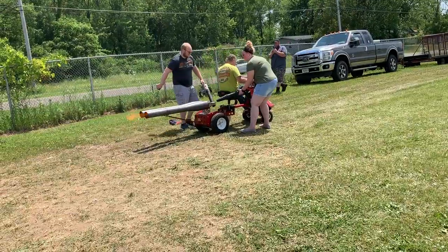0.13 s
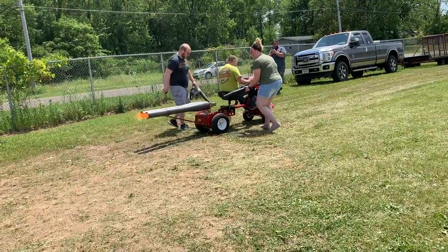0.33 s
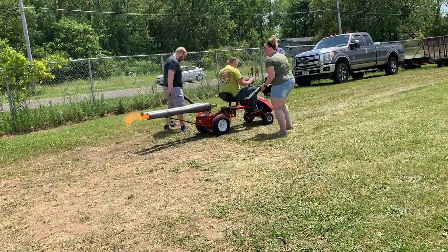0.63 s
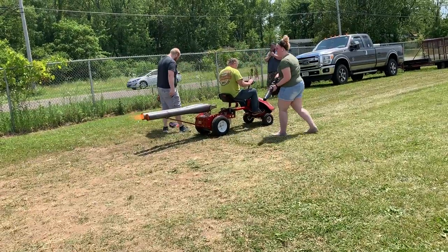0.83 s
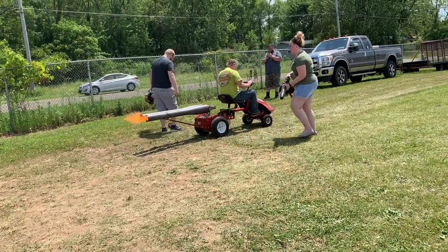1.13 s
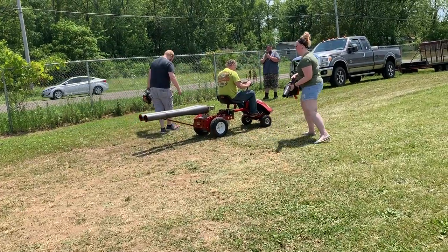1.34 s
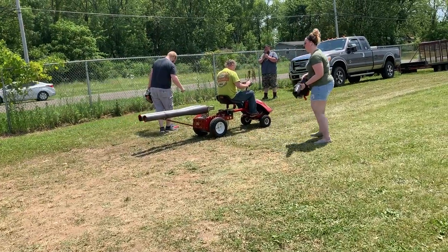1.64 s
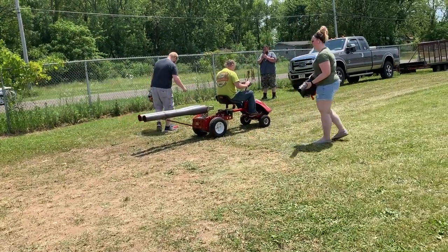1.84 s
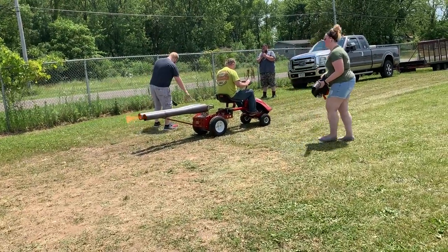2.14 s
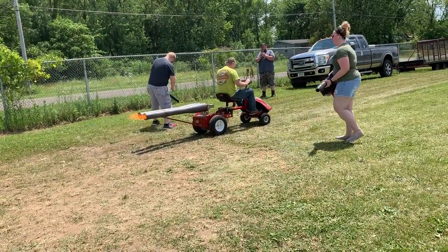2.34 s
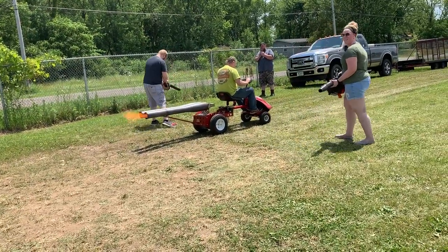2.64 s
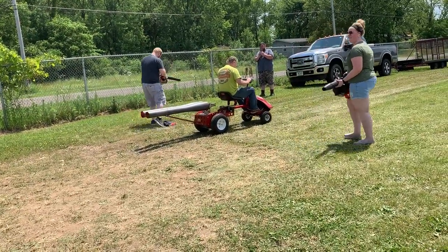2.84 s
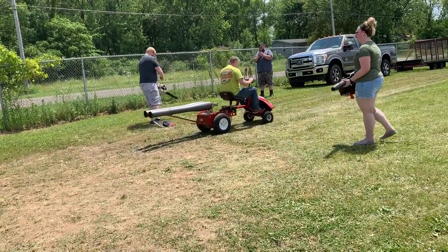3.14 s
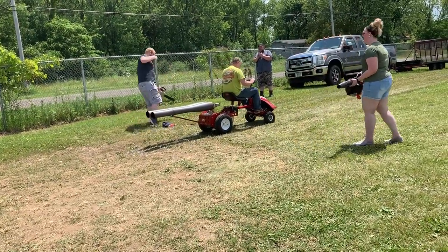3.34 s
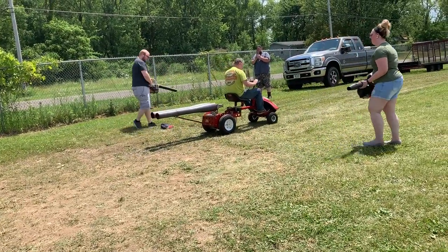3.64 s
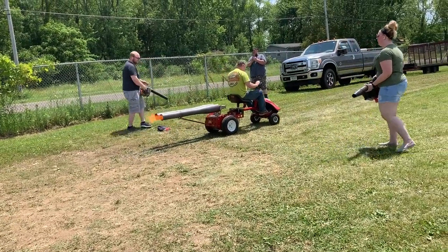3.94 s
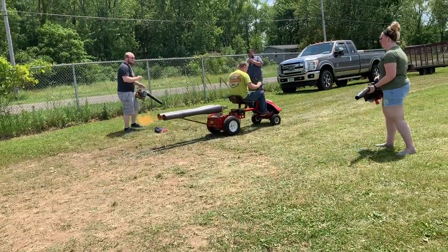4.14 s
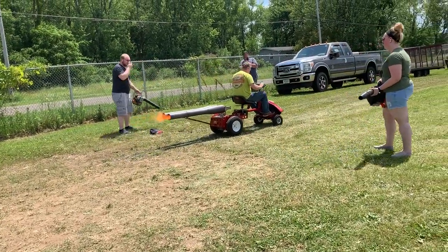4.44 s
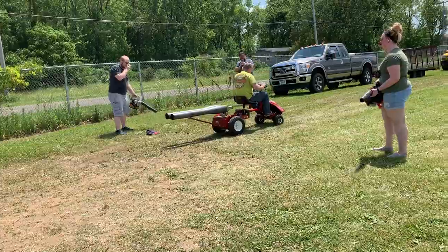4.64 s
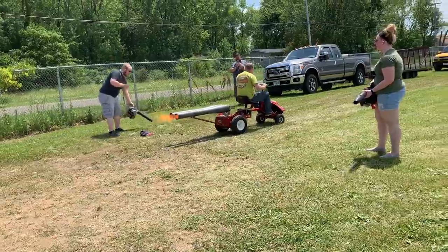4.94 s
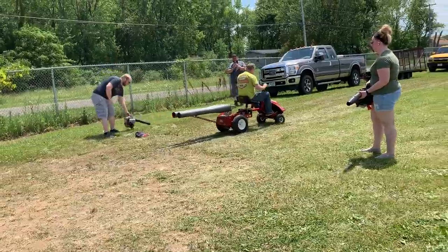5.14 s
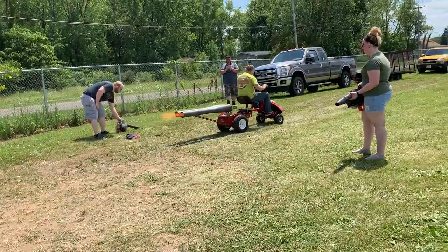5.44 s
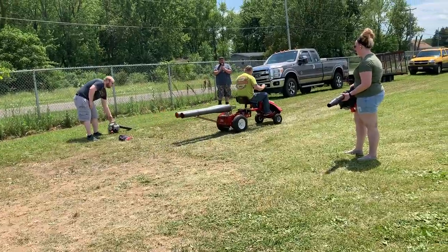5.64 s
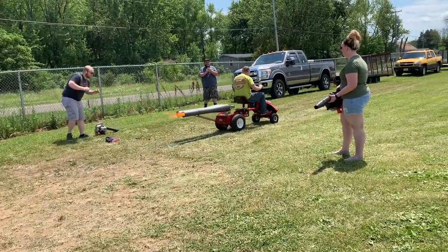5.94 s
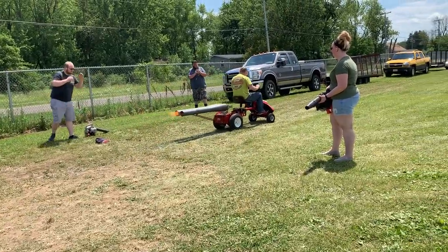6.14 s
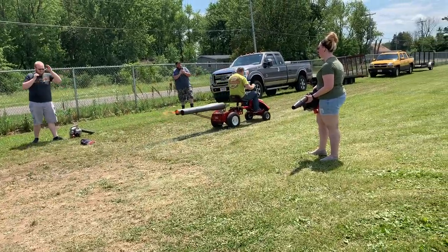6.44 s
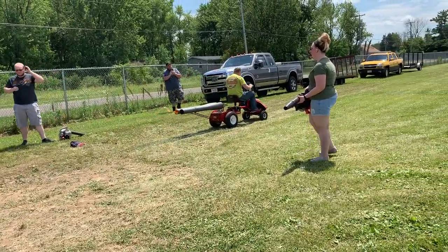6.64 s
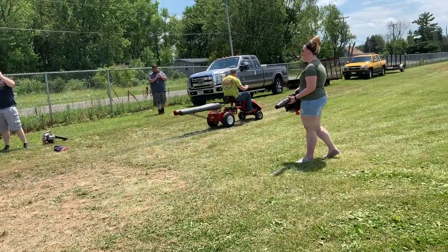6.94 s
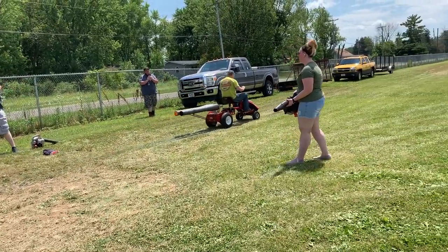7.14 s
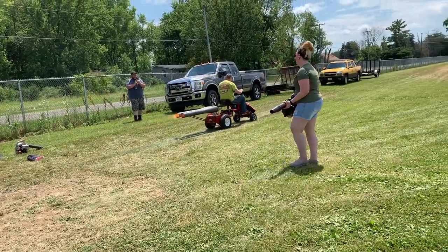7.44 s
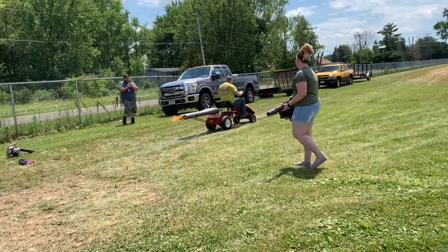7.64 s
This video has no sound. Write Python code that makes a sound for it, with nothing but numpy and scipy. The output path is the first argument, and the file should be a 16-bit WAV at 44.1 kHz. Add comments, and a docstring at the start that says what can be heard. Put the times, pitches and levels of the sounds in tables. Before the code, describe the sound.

From 0 seconds two pulse jets on a small tractor are already running at full, locked together in a loud low drone around 114 hertz, mostly smooth fundamental with soft overtones and a muffled roar beneath. Within the first second and a half the burn sags and rebounds several times, and ragged gas cracks, one per cycle, grow out of the hum. From about 1.5 to 6.5 seconds the buzz is harsh and raspy, with sizzling treble and sporadic harder pops, notably near 2.8, 3.4 to 3.6, 5.1 and 5.75. Pitch wavers and drifts down slightly to about 110. After 6.5 the crackle softens as the pipes swing away, while overtones keep the drone full and buzzing. It is still running when it stops at 7.8. Open lawn, very short dull ground reflection, phone stereo with treble differing between sides.

```python
"""Two pulse jets drone in step on a small tractor over a lawn: a steady pipe tone with overtones.
Each mouth also throws a ragged crack of gas once a cycle, in three bands of gated noise, over filtered roar.
Short dips and rebounds make the burn surge and sag; a dulled, delayed copy of the gas noise is the lawn's echo.
The echo shortens and fades as the pipes swing away. A phone's two microphone ports hear the treble apart."""
import sys
import numpy as np
from scipy import signal
from scipy.fft import rfft, irfft
from scipy.io import wavfile
from scipy.ndimage import uniform_filter1d, map_coordinates

SR = 44100
rng = np.random.default_rng(int(sys.argv[2]) if len(sys.argv) > 2 else 0)


def store_pcm(level_fs):
    """Save levels as 16-bit WAV."""
    pcm = np.round(np.clip(level_fs, -1, 1) * 32767).astype(np.int16)
    wavfile.write(sys.argv[1], SR, np.atleast_2d(pcm).T)


N = 343098  # samples, about 7.78 s


def undb(db):
    """Turn dB into a linear gain."""
    return 10 ** (np.asarray(db) / 20)


def unit(x):
    """Scale to rms 1."""
    return x / np.sqrt(np.mean(x ** 2))


def over_time(column_s, column):
    """Draw a table column as a straight-line envelope over the scene."""
    return np.interp(np.arange(N) / SR, column_s, column)


def over_hz(table):
    """Spread table values over every FFT bin, straight on a log-frequency axis."""
    hz, value = np.transpose(table)
    bins_hz = np.fft.rfftfreq(N, 1 / SR)
    return np.interp(np.log(bins_hz + 1), np.log(hz), value)


def colour(x, table):
    """Filter by a spectrum table in Hz and dB, then scale to rms 1."""
    return unit(irfft(rfft(x) * undb(over_hz(table)), N))


def walk(rate):
    """Smooth random drift: levels held for 1 / rate s, slewed twice, rms 1."""
    hold = int(SR / rate)
    steps = np.repeat(rng.standard_normal(N // hold + 1), hold)
    return unit(uniform_filter1d(uniform_filter1d(steps, hold), hold)[:N])


# The burn starves, then flares back; depth is before the tone and crack scalings
# columns: dip_s [s], depth_db [dB], wait_s [s from dip to flare]
STUMBLES = [(0.327,3,0.055),(0.535,4.5,0.065),(0.67,2,0.068),(0.798,1.0,0.12),(1.074,4.5,0.045),(1.177,2.5,0.062),(1.375,1.9,0.038),(1.455,1,0.04),(1.846,1.5,0.045),(1.959,2.3,0.035),(2.05,1.5,0.027),(2.137,1.5,0.039),(2.241,2,0.055),(2.325,1.7,0.034),(2.74,1.6,0.038),(2.832,3,0.042),(2.943,4,0.04),(3.277,2.5,0.043),(3.76,2.5,0.03),(3.847,1,0.035),(3.937,1.5,0.046),(4.02,1.4,0.035),(4.112,1,0.042),(4.226,2,0.037),(4.328,2,0.044),(4.422,1.5,0.035),(4.677,1.5,0.035),(5.01,1,0.032),(5.104,3.5,0.036),(5.315,1.5,0.033),(5.401,1.5,0.08),(5.529,3,0.035),(5.643,1,0.063),(5.931,1.7,0.04),(6.146,0.7,0.049),(6.413,2,0.06),(6.537,1.8,0.031),(6.667,1.2,0.07),(7.128,3,0.07),(7.29,2,0.093),(7.603,2,0.032)]
REBOUND, STUMBLE_WIDTH = 0.83, 0.37  # flare height over dip depth; bell width over wait
TONE_PER_DEPTH, CRACK_PER_DEPTH = 0.92, 2.34  # dB per dB of burn
FLUTTER_DB, FLUTTER_PER_S = 0.59, 22  # burn flutter, before those scalings
CRACK_FLUTTER_DB, FLARE_TOP_DB = 1.01, 5.5  # the crack's own flutter; its swell is capped here


def burn_surges():
    """Tone and crack swell in dB: starved dips and rebounds over a constant random flutter of the flame."""
    dip_s, depth_db, wait_s = np.transpose(STUMBLES)
    coarse_s = np.arange(0, N / SR, .002)[:, None]

    def bell(centre_s):
        return np.exp(-.5 * ((coarse_s - centre_s) / (STUMBLE_WIDTH * wait_s)) ** 2)

    stumble_db = (REBOUND * bell(dip_s + wait_s) - bell(dip_s)) @ depth_db
    burn_db = over_time(coarse_s[:, 0], stumble_db) + FLUTTER_DB * walk(FLUTTER_PER_S)
    crack_surge_db = CRACK_PER_DEPTH * burn_db + CRACK_FLUTTER_DB * walk(FLUTTER_PER_S)
    return TONE_PER_DEPTH * burn_db, np.minimum(crack_surge_db, FLARE_TOP_DB)


# Slow course of the firing rate, before the random wander
# columns: time_s [s], rate_hz [Hz]
FIRING_RATE = [(0, 114.3), (.5, 113.6), (.9, 114), (1.2, 112.8), (1.7, 113.7), (2.05, 112.6), (2.6, 113.5),
               (3.4, 111.6), (3.6, 112.6), (4.1, 111.2), (4.5, 112.2), (5.3, 112.2), (5.75, 110.3),
               (6, 111.2), (6.4, 109.8), (7, 110.1), (7.3, 112), (7.78, 110.2)]
WANDER_HZ, WANDER_PER_S = 0.6027, 9


def firing_turns(tone_surge_db):
    """Firing cycles elapsed: the pipes run a little faster while the burn is growing."""
    hz = over_time(*np.transpose(FIRING_RATE)) + WANDER_HZ * walk(WANDER_PER_S)
    burn_growth = np.gradient(tone_surge_db) * SR  # dB per s
    hz = hz + 0.017 * burn_growth + 0.811 * walk(45)
    return 1 + np.cumsum(hz) / SR


# Pipe fundamental and overtones, one row each, before surge and flicker
# columns: level_db [dB], follow [dB per dB of crack], growth_db [dB gained as the pipes swing away],
#          growth_power [exponent of scene time, 0 to 1]
PARTIALS = [(-12.5, 0.09, 0.2, 1.1), (-23, 0.18, 6.5, 1.45), (-36, 0.36, 10, 1.74), (-28, .5, 2, 1.3),
            (-39.5, 0, 7.5, 3.8)]
LEAD, LAG, WAVER = 2.3, 1.85, .15  # overtone phase, radians: second's lead, lag per further one, waver


def pipe_tone(turns, push_db, surge_db):
    """Resonating pipes as a stack of cosines; higher overtones trail in phase and waver more."""
    progress = np.arange(N) / (N - 1)
    out = 0
    for k, (level_db, follow, growth_db, growth_power) in enumerate(PARTIALS):
        partial_db = level_db + follow * push_db + growth_db * progress ** growth_power
        shift = (LEAD - LAG * (k - 1) + WAVER * np.sqrt(k) * walk(25)) if k else 0
        steepening = 1.3 if k else 1  # overtones surge harder than the fundamental
        flicker_db = (0.067 + 0.1 * k) * walk(30)
        gain = np.sqrt(2) * undb(partial_db + steepening * surge_db + flicker_db)
        out = out + gain * np.cos((k + 1) * 2 * np.pi * turns + shift)
    return out


# Firings of one pipe that crack much louder; each noise band takes its own share of the boost
# columns: bang_s [s], boost_db [dB before that share]
BANGS = [(0.362, 5), (1.992, 7), (2.09, 6), (2.205, 7.5), (2.533, 5.5), (2.761, 12), (3.082, 7.5),
         (3.357, 8), (3.385, 12), (3.477, 10.5), (3.564, 11), (3.599, 10), (3.786, 6.5), (4.29, 5.5),
         (4.325, 8.5), (4.834, 6.5), (4.957, 8.5), (5.049, 11.5), (5.156, 11.5), (5.28, 6.5), (5.746, 10),
         (5.774, 8), (6.178, 5), (6.205, 5), (6.586, 6.5)]


def firings(turns):
    """Per pipe: random lateness and size of each firing (spread 1), and the boost of the loud bangs."""
    late, size = rng.standard_normal((N // 200, 2, 2)).T
    bang_s, boost_db = np.transpose(BANGS)
    bang = np.round(turns[(bang_s * SR).astype(int)]).astype(int)
    extra_db = np.zeros_like(size)
    # a bang lands on the beat in both pipes, but only the first gets the boost
    late[:, bang] = 0
    size[:, bang] = 0
    extra_db[0, bang] = boost_db
    return list(zip(late, size, extra_db))


def bursts(turns, pipes, centre, rise, fall, jitter, scatter_db, spike_db, wash_db, bang):
    """Noise gated once a cycle by each pipe (times in cycles), spiky inside, over a steady wash."""
    cycle = np.floor(turns - centre + .4).astype(int)
    out = 0
    for late, size, extra_db in pipes:
        place = turns - centre - cycle - jitter * late[cycle]
        # part of the size is common to all bands, part is this band's own; the top is capped
        scatter = np.minimum(.8 * size + .6 * rng.standard_normal(len(size)), 1.3)
        size_db = scatter_db * scatter + bang * extra_db
        envelope = np.exp(np.where(place < 0, place / rise, -place / fall))
        gate = undb(size_db[cycle]) * envelope + undb(wash_db)
        spikes = undb(spike_db * np.clip(rng.standard_normal(N), -3, 2.5))
        # two rows share the gate and spikes but not the fine noise
        out = out + gate * spikes * rng.standard_normal((2, N))
    return out


# Colours of the exhaust fronts at the mouths, low to high band, and of the turbulent roar between the lines
# columns of all four: freq_hz [Hz], level_db [dB, relative within the table]
CRACK_COLOUR = [(60, -18.5), (300, -11.5), (700, 4), (1200, -1.5), (1500, -1.5), (1900, -6.5), (2400, -13),
                (3200, -28.5), (4500, -45)]
RASP_COLOUR = [(1200, -32), (2000, -1), (2600, -5), (3100, 1), (3600, -8), (4400, -8), (5500, -27)]
SIZZLE_COLOUR = [(2000, -25.5), (3500, 2), (4400, 1), (5500, -6), (8000, -5.5), (11000, -7.5),
                 (15500, -20.5)]
ROAR_COLOUR = [(15, -34.5), (50, -17), (70, -10), (100, -6.5), (170, -3.5), (300, -8), (370, -10), (420, 0),
               (480, -6), (650, -4), (900, -12.5), (3000, -28), (16000, -43)]
ROAR_DB, ROAR_SWELL_DB = -33, 1.0


def exhaust_gas(turns, crack_db, treble_db):
    """Crack, rasp and sizzle of the exhaust fronts over an unbroken roar; rows: direct, scattered wave."""
    pipes = firings(turns)
    crack = bursts(turns, pipes, centre=.03, rise=.05, fall=.12, jitter=.045,
                   scatter_db=2.7, spike_db=4.5, wash_db=-20, bang=.8)
    rasp = bursts(turns, pipes, centre=-.01, rise=.04, fall=.12, jitter=.04,
                  scatter_db=3.5, spike_db=6, wash_db=-24, bang=.5)
    sizzle = bursts(turns, pipes, centre=-.03, rise=.035, fall=.11, jitter=.04,
                    scatter_db=3.2, spike_db=6, wash_db=-14, bang=.4)
    roar_gain = undb(ROAR_DB + ROAR_SWELL_DB * walk(5))
    roar = roar_gain * colour(rng.standard_normal((2, N)), ROAR_COLOUR)
    treble = colour(rasp, RASP_COLOUR) + undb(-2) * colour(sizzle, SIZZLE_COLOUR)
    return undb(crack_db) * colour(crack, CRACK_COLOUR) + undb(treble_db) * treble + roar


# Bounce off the lawn as the pipes swing away
# columns: time_s [s], delay_ms [ms], gain [linear]
LAWN_BOUNCE = [(0, .71, .9), (1.5, .685, .9), (4.7, .67, .9), (5.5, .65, .85), (6.3, .62, .85),
               (7.2, .58, .6), (7.78, .55, .5)]
GRASS_HZ = 1900  # the filter runs forward and back, so it cuts twice


def lawn_echo(x):
    """Direct sound plus a duller, slightly later bounce off the grass; the moving delay slides the comb."""
    time_s, delay_ms, gain = np.transpose(LAWN_BOUNCE)
    delay = over_time(time_s, delay_ms) * SR / 1000  # samples
    dull = signal.sosfiltfilt(signal.butter(1, GRASS_HZ, fs=SR, output="sos"), x)
    bounce = map_coordinates(dull, [np.arange(N) - delay], order=3, mode="nearest")
    return x + over_time(time_s, gain) * bounce


# How the phone's two ports differ
# columns: freq_hz [Hz], left_lead [radians]
PORT_PHASE = [(0, 0), (110, .05), (450, .12), (700, .36), (1460, .95), (2240, 3.0), (2580, 6.9),
              (2840, 7.3), (4570, 10.1), (6120, 9.3), (7150, 6.4), (8180, 5.8), (9730, 3.6), (10900, 3.0),
              (13200, .1), (14400, -.1), (15300, -1.9)]
# columns: freq_hz [Hz], left_minus_right_db [dB]
PORT_BALANCE = [(60, -0.5), (110, -0.5), (200, -1.0), (380, -1.0), (700, -0.5), (1290, 0.0), (2380, 0.0),
                (4400, -2.0), (8120, -0.5), (15000, 0.0)]
# columns: freq_hz [Hz], apart [power share of the right port taken from the scattered wave]
PORT_APART = [(30, .05), (80, .003), (350, .005), (700, .03), (1800, .1), (2500, .55), (3300, .3),
              (5000, .45), (6800, .7), (8000, .4), (10500, .12), (12500, .25), (15000, .45)]


def phone_ports(shared, scattered):
    """Left hears the shared wave, right blends in one scattered by the phone's body; phase and gain split."""
    apart = np.clip(over_hz(PORT_APART), 0, .9)
    phase = np.interp(np.fft.rfftfreq(N, 1 / SR), *np.transpose(PORT_PHASE))
    # half the offset goes to each port, in opposite directions
    tilt = undb(over_hz(PORT_BALANCE) / 2) * np.exp(.5j * phase)
    left = rfft(shared) * tilt
    # the scattered part keeps each burst's moment but not its fine shape
    right = (np.sqrt(1 - apart) * rfft(shared) + np.sqrt(apart) * rfft(scattered)) / tilt
    return irfft(np.array([left, right]), N)


# Slow course of the exhaust crack, before the burn surges
# columns: time_s [s], level_db [dB]
BLAST = [(0, -40), (.8, -36), (1.5, -31.5), (2.3, -30.5), (3.1, -30.5), (4.7, -29), (5.5, -30.5),
         (6.3, -29.5), (7, -32.5), (7.78, -35)]
BLAST_MEAN_DB = -31
TREBLE_DB, TREBLE_PER_CRACK = -43.5, 1.32  # rasp and sizzle: base level; dB per dB of crack


def scene():
    """Sum the pipe tone and the gas noise with its lawn bounce, heard at the phone's two ports."""
    crack_db = over_time(*np.transpose(BLAST))
    push_db = crack_db - BLAST_MEAN_DB
    tone_surge_db, crack_surge_db = burn_surges()
    turns = firing_turns(tone_surge_db)
    treble_db = TREBLE_DB + TREBLE_PER_CRACK * (push_db + crack_surge_db)
    gas = exhaust_gas(turns, crack_db + crack_surge_db, treble_db)
    direct, scattered = (lawn_echo(row) for row in gas)
    return phone_ports(pipe_tone(turns, push_db, tone_surge_db) + direct, scattered)


def record(dry):
    """The phone cuts the top steeply: an elliptic low-pass at 15.6 kHz."""
    return signal.sosfilt(signal.ellip(10, .2, 90, 15600, fs=SR, output="sos"), dry)


dry = scene()
out = record(dry)
store_pcm(out)
```